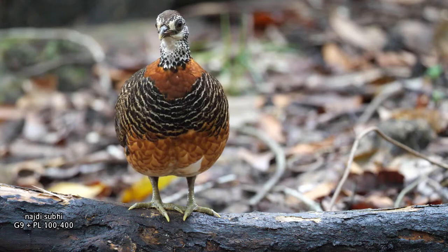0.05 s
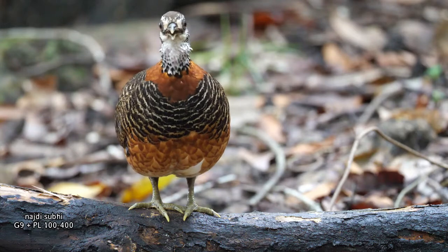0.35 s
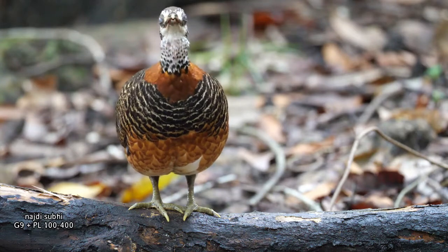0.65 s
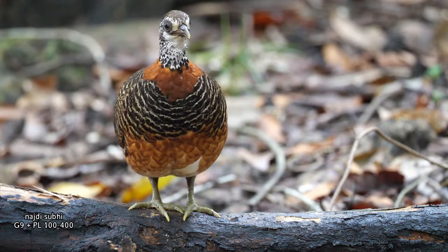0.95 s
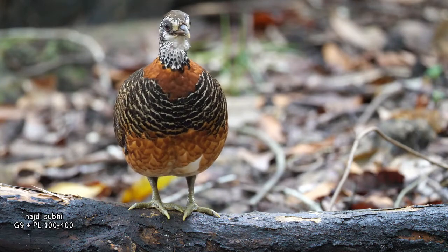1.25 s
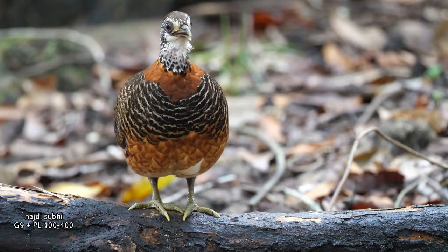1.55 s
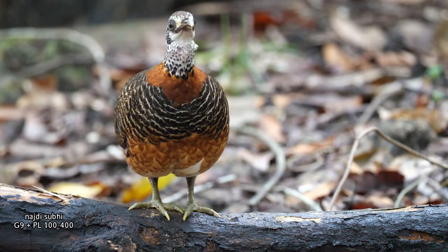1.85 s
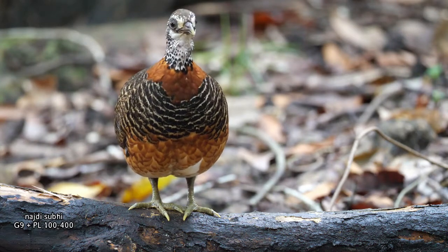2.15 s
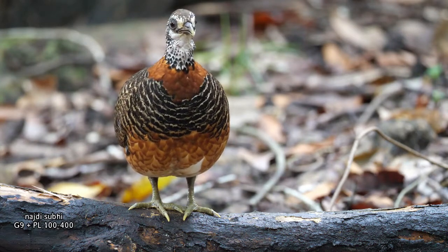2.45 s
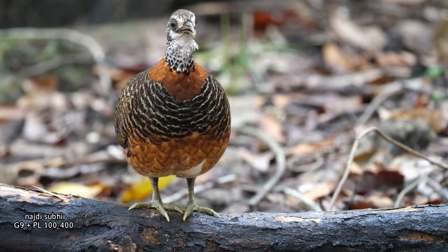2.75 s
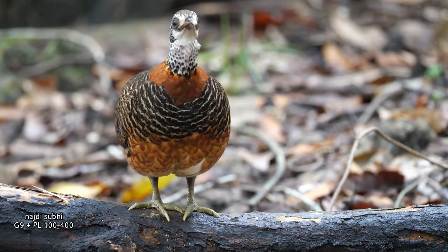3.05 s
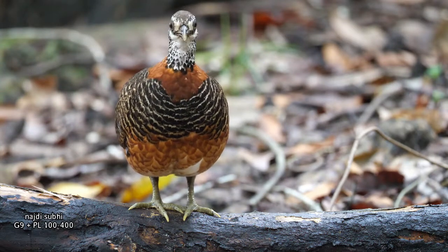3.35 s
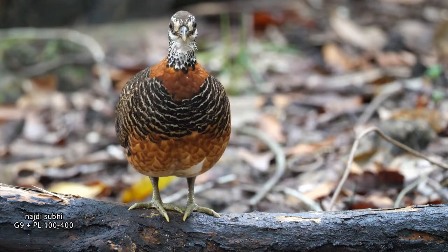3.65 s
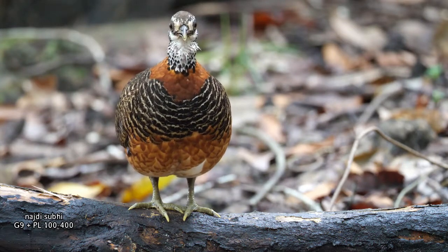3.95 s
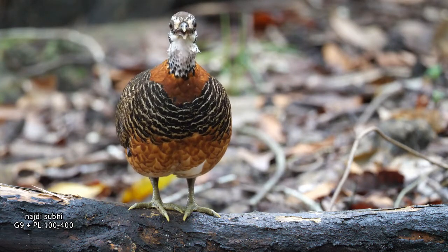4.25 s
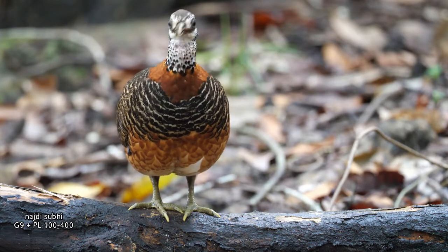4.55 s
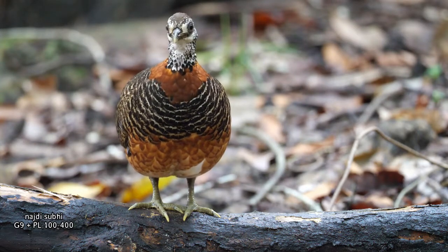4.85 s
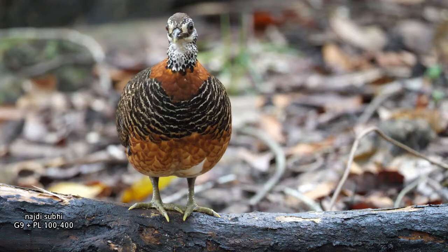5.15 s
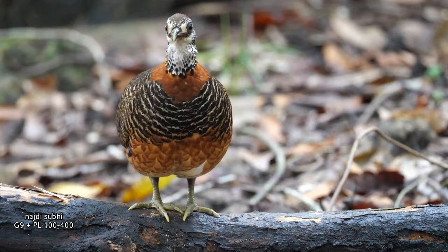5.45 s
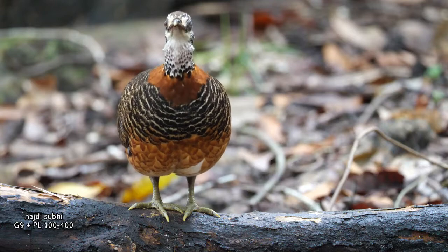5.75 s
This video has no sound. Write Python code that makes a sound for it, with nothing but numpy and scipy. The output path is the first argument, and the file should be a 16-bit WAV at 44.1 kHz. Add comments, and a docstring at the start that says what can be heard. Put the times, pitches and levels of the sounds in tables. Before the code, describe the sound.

A steady, soft hush of foliage and a faint low rumble fill a forest throughout. A partridge, close and centred, gives five clear whistles, at about 0.2, 1.3, 2.6, 3.9 and 5.2 seconds, each lasting a little over half a second. Every call starts softly, swells as it flips rapidly between two fairly high pitches, and ends in a quick downward slur, followed by a short echo among the trees. These calls are the loudest sound. Small birds chirp thinly and faintly far off, near the start and around 1.4, 2.7 and 5 seconds. Dry leaves rustle lightly around 1.3 and 4.3 seconds, with small ticks at about 0.9, 3.5, 4 and 4.9 seconds, slightly to the right. At 5 seconds something hard gives one short, dead knock close by, also slightly right, just before the final call.

```python
"""A steady hush of foliage, a low distant rumble and a far chirp open on a forest.
A partridge on a log gives five swelling, warbled whistles: its voice flips between two pitches in a
run of arched notes that ends in a downward slur. Trunks echo it and the trees scatter it.
Small birds chirp on far off, dry leaves tick and rustle, and near the end something hard knocks once
close by."""
import sys
import numpy as np
from scipy import signal
from scipy.fft import rfft, irfft, next_fast_len
from scipy.io import wavfile
from scipy.ndimage import uniform_filter1d, map_coordinates

SR = 44100
rng = np.random.default_rng(int(sys.argv[2]) if len(sys.argv) > 2 else 0)


def unload_audio(sound):
    """Save the sound as a 16-bit wav file, at the path given as the first command line argument."""
    columns = np.transpose(np.atleast_2d(sound))
    # keep every value between -1 and 1, then stretch to whole-number steps
    steps = np.round(np.clip(columns, -1, 1) * 32767)
    wavfile.write(sys.argv[1], SR, steps.astype(np.int16))


N = 260190
T = np.arange(N) / SR


def amp(db):
    """Decibels to gain."""
    return 10 ** (np.asarray(db) / 20)


def unit_rms(x):
    """Scale to rms 1."""
    return x / np.sqrt(np.mean(x ** 2) + 1e-20)


def at_hz(points, hz):
    """Read (frequency, value) points on a log axis."""
    knots_hz, values = np.transpose(points)
    return np.interp(np.log(hz + 1), np.log(knots_hz + 1), values)


def curve(points):
    """Read (time, value) points at every sample."""
    return np.interp(T, *np.transpose(points))


def wobble(rate_hz):
    """Smooth random curve, rate_hz knots a second."""
    return map_coordinates(rng.standard_normal(int(N * rate_hz / SR) + 4), [T * rate_hz])


def filtered(x, response):
    """Zero-phase filter of gain response(hz)."""
    n = x.shape[-1]
    size = next_fast_len(n + 8192)
    return irfft(rfft(x, size) * response(np.fft.rfftfreq(size, 1 / SR)), size)[..., :n]


def panned(x, left_db):
    """Stereo, the left louder by left_db."""
    return x * amp([[left_db / 2], [-left_db / 2]])


# Diffuse field: (frequency [Hz], left-right coherence [0..1])
COHERENCE = [(30, 0.61), (70, 1), (500, 0.94), (1100, 0.71), (2000, 0.6), (4000, 0.63), (8000, 0.27),
             (12000, .05)]
def diffuse(pair):
    """Mix two unrelated signals into a diffuse field, alike in the bass."""
    angle = lambda hz: np.arccos(np.clip(at_hz(COHERENCE, hz), -1, 1)) / 2
    mid, side = filtered(pair, lambda hz: np.array([np.cos(angle(hz)), np.sin(angle(hz))]))
    return np.array([mid + side, mid - side])


def patchy_noise(spectrum, patchy_db):
    """Diffuse noise of rms 1 with patches of random gain."""
    bins = signal.stft(rng.standard_normal((2, N)), nperseg=512)[2]
    patches = uniform_filter1d(rng.standard_normal(bins.shape[1:]), size=5, axis=0)
    patches = uniform_filter1d(patches, size=16, axis=1)
    pair = signal.istft(bins * amp(patchy_db * unit_rms(patches)), nperseg=512)[1][:, :N]
    return unit_rms(filtered(diffuse(pair), lambda hz: amp(at_hz(spectrum, hz))))


# Foliage spectrum: (frequency [Hz], relative density [dB])
FOLIAGE_SPECTRUM = [(400, -22.5), (800, -3), (1500, -0.5), (2400, -2), (3200, 1), (4200, -5), (5500, -5),
                    (7000, -7.5), (8300, -8.5), (9200, -23.5), (10000, -15.5), (11000, -19.5),
                    (15500, -17.5)]
# Foliage envelope: (time [s], level [dB])
FOLIAGE_DB = [(0, -49.5), (1, -50), (1.6, -49), (2.4, -51.5), (3, -50), (3.8, -50), (4.7, -50.5),
              (5.9, -50.5)]
def foliage():
    """Steady broadband hush of leaves."""
    return amp(curve(FOLIAGE_DB)) * patchy_noise(FOLIAGE_SPECTRUM, patchy_db=2)


# Rumble spectrum: (frequency [Hz], relative density [dB])
RUMBLE_SPECTRUM = [(40, -51), (95, -12), (125, -3), (170, 0.5), (250, -1.5), (340, -7), (450, -4.5),
                   (600, -12.5), (750, -6.5), (950, -28), (1500, -49)]
# Rumble envelope: (time [s], level [dB])
RUMBLE_DB = [(0, -54), (.8, -56), (2.7, -57), (3.3, -53.5), (3.8, -54.5), (4.3, -52), (5.2, -53),
             (5.9, -51)]
def rumble():
    """Low distant noise, its level wavering."""
    return amp(curve(RUMBLE_DB) + 0.78 * wobble(7)) * patchy_noise(RUMBLE_SPECTRUM, patchy_db=2)


# Drone spectrum: (frequency [Hz], relative density [dB])
DRONE_SPECTRUM = [(20, -32.5), (50, -25), (64, -19), (82, 0.5), (100, -5), (125, -6.5), (200, -31.5),
                  (500, -70.5)]
# Drone envelope: (time [s], level [dB])
DRONE_DB = [(0, -69.5), (1.3, -65), (2, -61.5), (5.9, -64.5)]
def drone():
    """Faint distant band of noise near 82 Hz."""
    return amp(curve(DRONE_DB)) * patchy_noise(DRONE_SPECTRUM, patchy_db=2.5)


# Forest decay: (frequency [Hz], T60 [s])
FOREST_T60_S = [(200, 0.14), (880, 0.61), (1150, 0.66), (4800, 0.42), (8000, 0.38), (14000, 0.07)]
def forest(x):
    """Scattering among trees: a diffuse tail, each frequency dying at its own rate."""
    hz, t, bins = signal.stft(rng.standard_normal((2, SR * 3 // 4)), SR, nperseg=256)
    envelope = amp(-60 * t / at_hz(FOREST_T60_S, hz)[:, None]) * (1 - np.exp(-t / 0.013))
    tail = diffuse(signal.istft(bins * envelope, SR, nperseg=256)[1])
    return signal.fftconvolve(x[None], tail / np.linalg.norm(tail[0]), axes=1)[:, :N]


# Far chirps: (time [s], length [s], start pitch [Hz], end pitch [Hz], relative level [dB])
BIRD_CHIRPS = [(0, 0.1, 3324, 3120, -55.5), (0.275, 0.071, 5750, 5630, -53),
               (0.332, 0.065, 8760, 6030, -52), (0.328, 0.2, 5150, 5050, -55),
               (1.279, 0.063, 1919, 1865, -53), (1.33, .09, 4450, 4260, -59.5),
               (1.449, 0.055, 1921, 2060, -51), (1.62, .12, 5400, 5400, -66),
               (2.627, .1, 3260, 3375, -54.5), (2.685, .09, 5700, 5390, -59), (3.35, .13, 3650, 3800, -60),
               (4.92, .18, 7180, 7180, -62), (5.162, 0.08, 2520, 1760, -55)]
def small_birds(waver=0.038):
    """Thin, quavering far whistles, direct and scattered by the trees."""
    song = np.zeros(N)
    quaver = 1 + waver * wobble(400)
    for start_s, length_s, start_hz, end_hz, db in BIRD_CHIRPS:
        span = (T >= start_s) & (T < start_s + length_s)
        progress = (T[span] - start_s) / length_s
        pitch_hz = (end_hz + (start_hz - end_hz) * (1 - progress) ** 1.6) * quaver[span]
        envelope = amp(db) * np.sqrt(2 * np.abs(np.sin(np.pi * progress)))
        song[span] += envelope * np.sin(2 * np.pi * np.cumsum(pitch_hz) / SR)
    return amp(0.5) * song + amp(-2.5) * forest(song)


NOTE_S, SLOWING_S, RELEASE_S = .063, .0015, .18  # mean note; growth per note; effort halving time
CREST_HZ, DIP_HZ = 1276, 1024  # full warble
FIRST_DIP_DEPTH_HZ, LAST_CREST_DROP_HZ = 20, 38.06
DIP_DB, SCATTER_DB, SCATTER_HZ = -3.5, .6, 3
def notes(start_s, first_dip_s, last_dip_s, opening_hz, opening_s, soft_db, climax_s, swell_s, climax_db):
    """Dips and crests of a call: notes slow, the warble widens, effort swells and lets go."""
    run_s = last_dip_s - first_dip_s
    n = round(run_s / NOTE_S)
    k = np.arange(n + 2)
    dip_s = np.append(start_s, first_dip_s + run_s * k / n - SLOWING_S * k * (n - k) / 2)
    crest_s = (dip_s[:-1] + dip_s[1:]) / 2
    effort = lambda t: 1 / (1 + ((t - climax_s) / np.where(t < climax_s, swell_s, RELEASE_S)) ** 2)
    level_db = lambda t: blend(soft_db, climax_db, effort(t))
    width = lambda t: 1 - np.exp(-((t - start_s) / opening_s) ** 4)
    pitch_jitter, level_jitter = rng.standard_normal((len(crest_s), 2)).T
    dip_hz = blend(opening_hz - FIRST_DIP_DEPTH_HZ, DIP_HZ, width(dip_s))
    crest_hz = blend(opening_hz, CREST_HZ, width(crest_s)) + SCATTER_HZ * pitch_jitter
    crest_hz[-1] -= LAST_CREST_DROP_HZ
    crest_db = level_db(crest_s) + SCATTER_DB * level_jitter
    return dip_s, dip_hz, level_db(dip_s) + DIP_DB, crest_hz, crest_db


def blend(a, b, share):
    """Linear crossfade from a to b."""
    return a * (1 - share) + b * share


BREAK_BEFORE_S, BREAK_AFTER_S = 0.017, 0.01435
SHORT_BREAK_S, DEEP_BREAK_S, SHALLOW_BREAK_S = .0042, .006, .0105  # half-widths
def voice_breaks(t, dip_s, depth):
    """Gate: the voice breaks once at a shallow dip, on both sides of a deep one."""
    def notches(at_s, share, width_s):
        return np.prod(1 - share * np.exp(-((t[:, None] - at_s) / width_s) ** 2), axis=1)
    before = notches(dip_s - BREAK_BEFORE_S * depth, depth, SHORT_BREAK_S)
    after = notches(dip_s + BREAK_AFTER_S * depth, 1, blend(SHALLOW_BREAK_S, DEEP_BREAK_S, depth))
    return before * after


FLIP_HEIGHT, DOME_SHARE, NOTE_RISE_DB = .65, .065, 5.5
SLUR_S, SLUR_FADE_S, SAG_PER_S = .017, .012, 3.5
def warble(call):
    """Controls of one call: the voice flips between dip and domed crest, then slurs down."""
    *phrase, end_s, end_hz, end_db = call
    dip_s, dip_hz, dip_db, crest_hz, crest_db = notes(*phrase)
    span = (T >= dip_s[0]) & (T < end_s + 3 * SLUR_FADE_S)
    t = T[span]
    position = np.interp(t, dip_s, np.arange(len(dip_s)))  # in notes
    note = np.minimum(position.astype(int), len(crest_hz) - 1)
    height = np.abs(np.sin(np.pi * position))
    arch = 1 - np.exp(-(height / FLIP_HEIGHT) ** 3)
    slur = np.clip(1 + (t - end_s) / SLUR_S, 0, 1)
    crest = arch * (1 - slur)
    flip = lambda dips, crests: blend(np.interp(t, dip_s, dips), crests[note], arch)
    depth = 1 - np.exp(-np.abs(crest_hz - dip_hz[:-1]) / 110)
    dome = 1 + DOME_SHARE * depth[note] * crest * (height ** 2 - .8)
    dying_s = np.maximum(t - end_s, 0)
    pitch_hz = blend(flip(dip_hz, crest_hz), end_hz, slur ** 2) * dome * np.exp(-SAG_PER_S * dying_s)
    level_db = blend(flip(dip_db, crest_db), end_db, slur)
    level_db += NOTE_RISE_DB * crest * (position - note - .5)
    attack = 1 - np.exp(-(t - dip_s[0]) / 0.0064)
    fade = np.exp(-(dying_s / SLUR_FADE_S) ** 2)
    gate = attack * fade * voice_breaks(t, dip_s[1:-1], depth[1:])
    return span, pitch_hz, amp(level_db) * gate, crest


# Whistle overtones: (harmonic number, base level [dB], effort exponent)
HARMONICS = [(2, -28.7, 0.7), (3, -33, 1.2), (4, -36.5, .02), (5, -44, .6), (6, -34, 1.9), (7, -46.5, 1.1),
             (9, -50.5, 1.6)]
# Windpipe and bill colour: (frequency [Hz], gain [dB])
THROAT_DB = [(2000, 3.5), (2550, 3), (3150, 16.5), (3800, -3), (4550, 3.5), (5150, 3.5), (6300, -1),
             (7100, 4.5), (7700, -1), (8800, -14.5), (11500, -4)]
def overtones(pitch_hz, phase, effort):
    """Harmonics that grow with effort, coloured by windpipe and bill."""
    return sum(amp(db + at_hz(THROAT_DB, k * pitch_hz)) * effort ** growth * np.sin(k * phase)
               for k, db, growth in HARMONICS)


# Bill resonances: (centre [Hz], width [Hz], gain [dB])
BILL_RESONANCES = [(4640, 600, -3.5), (7950, 1000, -9.5), (11950, 430, -20)]
def bill(hz):
    """Gain of the resonances that shape air hissing through the bill."""
    return sum(amp(db) / (1 + (2 * (hz - centre_hz) / width_hz) ** 2)
               for centre_hz, width_hz, db in BILL_RESONANCES)


# Calls: (start [s], first dip [s], last dip [s], opening pitch [Hz], opening time [s],
# effortless level [dB], climax [s], swell [s], climax level [dB],
# slur bottom [s], slur pitch [Hz], slur level [dB], rasp [dB])
PARTRIDGE_CALLS = [(.161, .205, .712, 1238, .25, -45.5, .63, .205, -16.2, .756, 699.3, -44, 0),
                   (1.348, 1.41, 1.981, 1203, .228, -46, 1.928, 0.21, -18, 2.035, 697.4, -41, 1),
                   (2.621, 2.677, 3.241, 1195, .265, -45, 3.185, .24, -16.2, 3.297, 687.4, -42, 1),
                   (3.92, 3.982, 4.485, 1221, .238, -45.5, 4.447, 0.2, -17.2, 4.553, 905.6, -29.5, -1.5),
                   (5.237, 5.288, 5.8, 1212, .205, -48.5, 5.757, .23, -17, 5.855, 725, -38, 0)]
def partridge(full_effort_db=-18, edge_db=0.5, dip_edge_db=-8, hiss_db=-49.5, ring_db=4.0):
    """Nearly pure whistle; overtones and hiss rise on the crests as the bird pushes harder."""
    pitch_hz, strength, crest, rasp = np.zeros((4, N))
    for *call, rasp_db in PARTRIDGE_CALLS:
        span, *controls = warble(call)
        pitch_hz[span], strength[span], crest[span] = controls
        rasp[span] = amp(rasp_db)
    pitch_hz *= 1 + .004 * wobble(250)
    strength *= amp(.7 * wobble(200))
    phase = 2 * np.pi * np.cumsum(pitch_hz) / SR
    effort = strength / amp(full_effort_db)
    whistle = np.sqrt(2) * strength * np.sin(phase)
    edge = overtones(pitch_hz, phase, effort)
    edge *= amp(edge_db + dip_edge_db * (1 - crest)) * np.sqrt(2) * strength * rasp
    hiss = amp(hiss_db) * effort * rasp * unit_rms(filtered(rng.standard_normal(N), bill))
    direct = whistle + edge + amp(-5) * hiss
    # the bill beams its resonances into the trees
    beamed = amp(ring_db) * filtered(edge, bill) + hiss
    scattered = forest(amp(-13) * direct + beamed)
    return panned(direct + trunks(direct) + scattered, left_db=-0.5)


# First echoes: (delay [s], gain [dB], left over right [dB])
TRUNK_ECHOES = [(0.013, -19.5, 19.5), (0.021, -14, -7.5), (.0365, -21.5, 8), (.058, -14.5, -11.5)]
def trunks(x):
    """Single echoes off the nearest trunks; they beat against the sliding pitch."""
    return sum(panned(amp(db) * np.interp(T - delay_s, T, x, left=0), left_db)
               for delay_s, db, left_db in TRUNK_ECHOES)


# Dry litter spectrum: (frequency [Hz], relative density [dB])
LITTER_SPECTRUM = [(30, -45), (400, -11.5), (1500, -2), (4000, -2), (8000, -5.5), (10000, -10.5),
                   (15000, -16.5)]
def crackle(bursts, envelope, spiky_db):
    """Bursts of tiny leaf fractures, each with its own treble tilt."""
    out = np.zeros((2, N + SR))
    n = SR // 3
    for start_s, length_s, db, treble_db in bursts:
        noise = rng.standard_normal((2, n))
        spikes = amp(spiky_db * np.repeat(rng.standard_normal(n), 16)[:n])
        tilt = [(6000, 0.004), (13000, treble_db)]
        colour = lambda hz: amp(at_hz(LITTER_SPECTRUM, hz) + at_hz(tilt, hz))
        grains = unit_rms(filtered(diffuse(noise * spikes), colour))
        out[:, round(start_s * SR):][:, :n] += amp(db) * envelope(T[:n] / length_s) * grains
    return out[:, :N]


# Leaf and twig ticks: (time [s], length [s], level [dB], treble tilt [dB])
LEAF_TICKS = [(.931, .025, -49, -3), (1.178, .02, -68, 17), (1.392, 0.025, -60, 16), (3.504, .018, -37, 1),
              (3.516, 0.035, -48.5, 1.5), (4.0111, 0.0034, -37.5, -2), (4.8948, 0.0051, -38.5, 10.5),
              (4.898, 0.014, -42, 1.5), (4.908, 0.04, -55.5, 5)]
# Stirring litter: (time [s], length [s], level [dB], treble tilt [dB])
LEAF_RUSTLES = [(1.23, 0.16, -54.5, -1), (1.44, 0.1, -48.5, -4), (2.67, 0.096, -60, -2.5),
                (4.17, .17, -56, 10.5), (4.38, 0.2, -55.5, 2)]
def leaves():
    """Short ticks and softer stirrings in the dry litter."""
    snap = lambda u: 4 * u * np.exp(1 - 4 * u)
    swell = lambda u: np.sqrt(np.abs(np.sin(np.pi * np.minimum(u, 1))))
    ticks = crackle(LEAF_TICKS, snap, spiky_db=-0.5)
    rustles = crackle(LEAF_RUSTLES, swell, spiky_db=5)
    litter = panned(ticks + rustles, left_db=-4.5)
    return litter + amp(-16) * forest(litter.mean(0))


# Blow spectrum: (frequency [Hz], relative density [dB])
KNOCK_SPECTRUM = [(80, -29.5), (180, -15.5), (300, -0.5), (600, -0.5), (1100, -3.5), (1600, -13),
                  (2100, -12.5), (3000, -6), (4200, -12), (6000, -26.5), (8000, -27.5), (10000, -41),
                  (15000, -40.5)]
def knock(time_s=5.0056, gain_db=16, bounce_s=0.00411, bounce_db=-5, bounce_cutoff_hz=1100):
    """One hard dead blow, a duller second contact, and their scatter among the trees."""
    size = 4096
    cepstrum = irfft(np.log(amp(at_hz(KNOCK_SPECTRUM, np.fft.rfftfreq(size, 1 / SR)))))
    cepstrum[1:size // 2] *= 2  # fold to minimum phase: sharp onset
    cepstrum[size // 2 + 1:] = 0
    blow = amp(gain_db) * irfft(np.exp(rfft(cepstrum)))
    bounce = amp(bounce_db) * signal.lfilter(*signal.butter(2, bounce_cutoff_hz, fs=SR), blow)
    direct = np.zeros(N)
    direct[round(time_s * SR):][:size] += blow
    direct[round((time_s + bounce_s) * SR):][:size] += bounce
    bright = signal.lfilter(*signal.butter(1, 2500, 'high', fs=SR), direct)
    # nearby litter returns a short spray of echoes
    spray = diffuse(rng.standard_normal((2, SR // 6))) * amp(-60 * T[:SR // 6] / 0.11)
    near = amp(-1.5) * signal.fftconvolve(bright[None], spray / np.linalg.norm(spray[0]), axes=1)[:, :N]
    return panned(direct, left_db=-4) + panned(near, left_db=-6.5) + amp(-11) * forest(bright)


def scene():
    """The partridge in front, the forest all round."""
    return partridge() + small_birds() + leaves() + knock() + drone() + rumble() + foliage()


TOP_HZ = 15800
def record(dry):
    """Brick-wall low-pass."""
    return filtered(dry, lambda hz: hz < TOP_HZ)


dry = scene()
out = record(dry)
unload_audio(out)
```